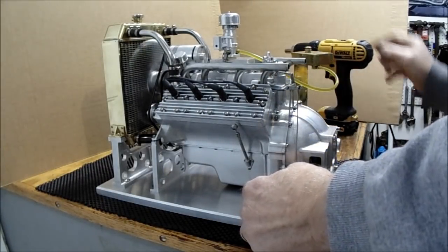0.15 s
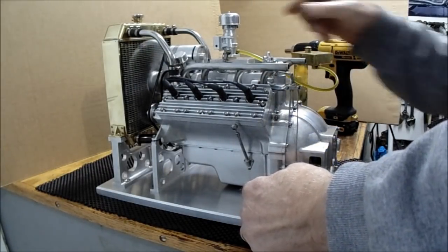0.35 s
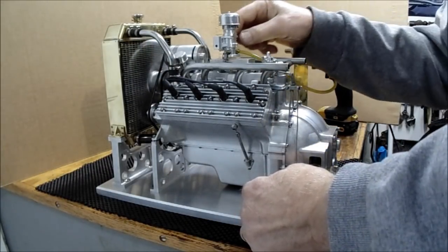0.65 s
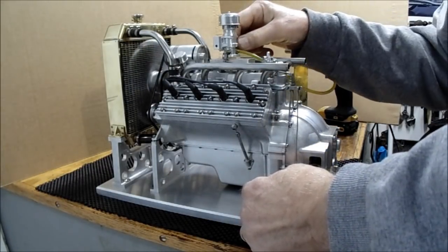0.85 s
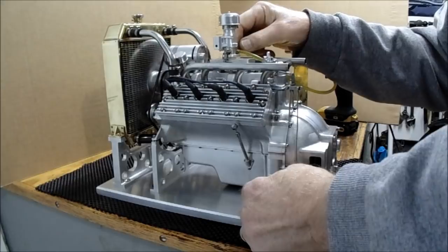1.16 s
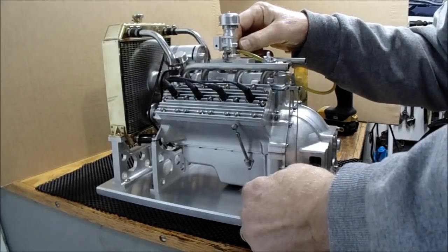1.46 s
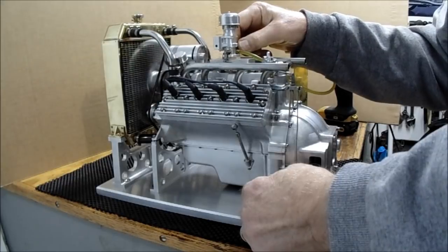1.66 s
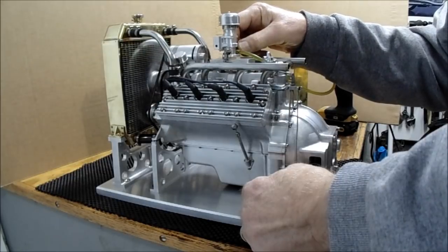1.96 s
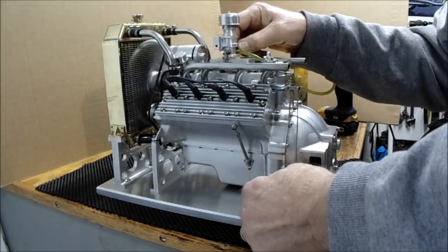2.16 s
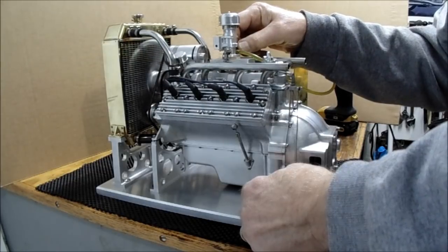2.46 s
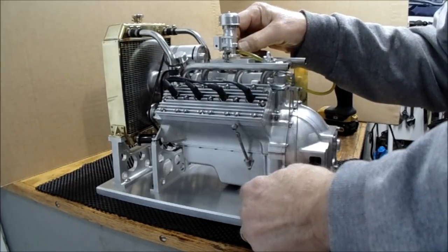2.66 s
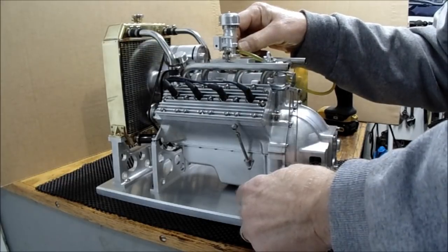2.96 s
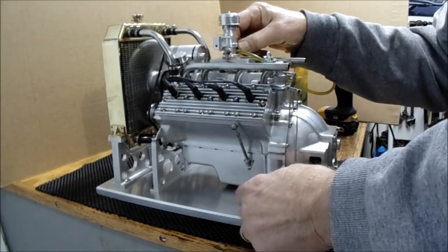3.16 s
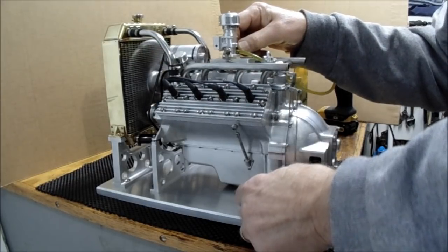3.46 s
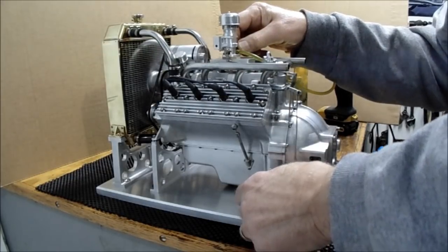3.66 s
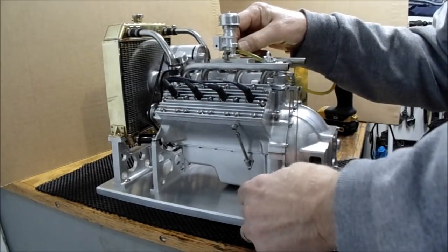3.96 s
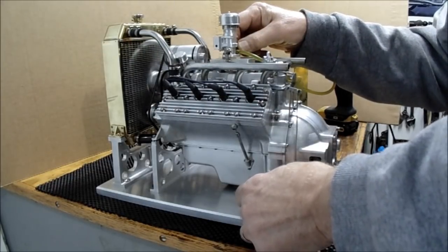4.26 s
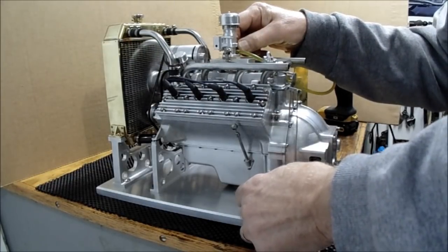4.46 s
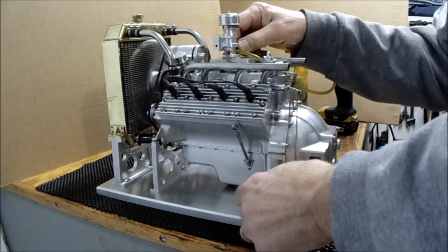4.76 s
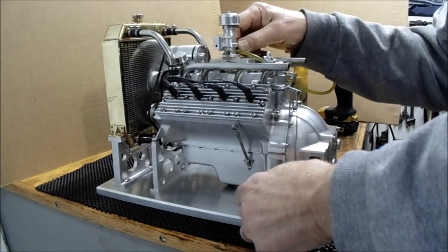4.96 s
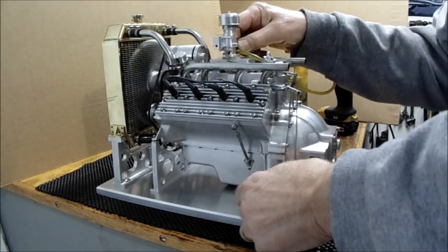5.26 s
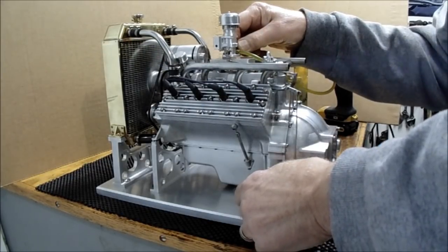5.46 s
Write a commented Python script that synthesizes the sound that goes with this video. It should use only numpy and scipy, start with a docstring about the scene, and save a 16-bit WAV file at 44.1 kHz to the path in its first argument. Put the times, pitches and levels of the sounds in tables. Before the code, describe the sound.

A miniature V8 engine idles lumpily on a workbench, revs up, drops back briefly, then climbs again to a hard, clattering snarl.

```python
"""A lumpy, stumbling idle: a miniature V8 chugs on a workbench, an arm's length away. It is opened up,
drops back as the throttle shuts, then climbs again to a hard snarl. Each firing booms in the exhaust
pipes, rings the block and spits gas. On top, the valve gear clatters, loose metal rattles and snaps,
and air whistles through the nearly closed carburettor. A low rumble and a short echo sit behind it."""
import sys
import numpy as np
from scipy import signal
from scipy.fft import rfft, irfft
from scipy.io import wavfile
from scipy.ndimage import uniform_filter1d

SR = 44100
rng = np.random.default_rng(int(sys.argv[2]) if len(sys.argv) > 2 else 0)


def materialize(psi):
    """Save the field psi as 16-bit PCM at rate SR to the path in sys.argv[1].

    A 1-D psi becomes a single channel; in a 2-D psi each row is a channel.
    """
    bounded = np.clip(np.atleast_2d(psi).T, -1, 1)
    quanta = np.round(bounded * 32767).astype(np.int16)
    wavfile.write(sys.argv[1], SR, quanta)


N = 247842
TIME = np.arange(N) / SR

# The rev curve, eight firings to a cycle. Each row: time in seconds, firings per second.
FIRING_RATE = [(0, 99.1), (.2, 93.8), (.4, 91.05), (.6, 93), (.8, 100), (1.02, 117), (1.2, 112),
               (1.35, 116), (1.7, 116.9), (1.95, 116.9), (2.08, 107.1), (2.24, 115), (2.42, 113.1),
               (2.58, 104.1), (2.72, 124), (2.86, 130.8), (3.0, 159.9), (3.2, 178.9), (3.35, 190.1),
               (3.58, 200), (3.65, 222), (3.73, 236), (3.85, 246.9), (3.95, 250), (3.99, 232),
               (4.03, 183.7), (4.15, 164.9), (4.25, 176.1), (4.33, 190), (4.45, 205.9), (4.6, 211.3),
               (4.7, 217.9), (4.8, 232), (4.87, 239.3), (4.93, 235.8), (5.0, 249.9), (5.1, 254.7),
               (5.3, 264.1), (5.45, 260.1), (5.62, 267.3)]
# How hard the engine works; layers follow it by a share. Each row: time in seconds, effort in dB.
ENGINE_EFFORT = [(0, -3.5), (.55, -3.5), (1.05, -0.6), (1.7, 0.15), (2.45, -0.8), (2.53, -3), (2.75, -0.14),
                 (3.05, 3.5), (3.2, 3), (3.55, 3), (3.7, 4.5), (3.8, 1.5), (3.96, 1.5), (4.02, -6),
                 (4.15, -8), (4.27, -2.5), (5.1, 2.5), (5.62, 2.5)]
# The cylinders, in firing order. Each row: exhaust and knock at idle, exhaust and knock at top speed,
# gas spit, all in relative dB, then lag in firing intervals for a fully uneven burn at top speed.
CYLINDER_VOICES = [(-1, -2.5, 3.5, 5.5, 19.5, 0.0028), (-0.5, 3.5, 3.5, 11.5, -5, -0.068),
                   (1, -0.5, -1, -6, 18, -0.0039), (-4.5, -2.5, -4.5, 10.5, 1, .07),
                   (-2, 3, -1.5, -3, 5, 0), (-1, 1.5, -8, 13.5, 0, -.07), (0.5, -3.5, -3, 14, 22, 0),
                   (1.5, -3.5, 2.5, -4, -9, .07)]
# Runs of strong firings. Each row: start in seconds, length in seconds, lift of the lope in dB.
IDLE_CHUGS = [(0.056, 0.032, 4.5), (0.233, 0.061, 3), (0.727, 0.13, 2), (0.979, 0.063, 5),
              (1.077, 0.083, 3.5), (1.278, 0.069, 4.5), (1.419, 0.056, 4.5), (1.57, 0.14, 4.5),
              (1.774, 0.043, 3.5), (1.883, 0.088, 4.5), (2.065, 0.11, 2.5), (2.208, 0.0424, 6.5),
              (2.376, 0.079, 6.5), (2.665, .28, 4.5)]
# Misfires. Each row: centre in seconds, dip of the lope in dB.
MISFIRE_DIPS = [(0.016, -8), (.195, -7), (.375, -8), (0.574, -5), (1.22, -4), (1.5, -5.5), (2.05, -2.5),
                (2.299, -8), (2.365, -7), (2.52, -7.5), (2.878, -4.5), (3.798, -4), (3.906, -8), (4.02, -5),
                (4.92, -7), (4.988, -7), (5.103, -8), (5.225, -4), (5.325, -5), (5.39, -5), (5.58, -5)]
# Bass thumps of the uneven burn. Each row: centre in seconds, level in dB.
BASS_THUMPS = [(.12, -39), (.25, -44), (.48, -39), (.61, -41), (.72, -41), (.84, -39.5), (.92, -38),
               (1.05, -34), (1.2, -35), (1.33, -35), (1.481, -30), (1.61, -34.5), (1.73, -34), (1.84, -34),
               (1.969, -33), (2.099, -34), (2.23, -34), (2.44, -28.5), (2.6, -38), (2.75, -32), (2.88, -34),
               (3.029, -33.5), (3.72, -36), (3.86, -38), (4.0, -36), (4.53, -38), (4.77, -39), (5.1, -35),
               (5.21, -38), (5.33, -37), (5.46, -37), (5.6, -35)]
# Brief surges in the knocking's middle band as the engine picks up. Each row: centre in seconds, boost in dB.
PICKUP_SURGES = [(3.03, 3), (3.64, 2)]
# Sharp metallic snaps. Each row: start in seconds, relative level in dB.
METAL_SNAPS = [(0.9837, -18), (1.842, -15), (2.1354, -17), (2.3934, -17), (2.451, -6.5), (2.7247, -13.5),
               (2.7855, -16), (2.8414, -15), (2.9786, -10), (3.0275, -17), (3.0775, -13), (3.091, -14),
               (3.3253, -10.5), (3.341, -15), (3.4236, -10.5), (3.686, -11), (3.703, -11), (3.727, -13),
               (3.7704, -18), (3.8363, -11.5), (4.8543, -14), (4.9182, -17), (4.9552, -17), (5.0215, -14),
               (5.1287, -15), (5.1472, -12), (5.2405, -15), (5.3732, -14), (5.3921, -12), (5.4226, -15),
               (5.4535, -14), (5.487, -15), (5.5153, -14), (5.5458, -15), (5.5751, -15)]
# The clean exhaust note of regular firing. Each row: time in seconds, base level in dB.
DRONE_LEVEL = [(0, -38), (.9, -35), (1.02, -26), (1.22, -28), (1.4, -25.5), (1.65, -22.5), (1.95, -23.5),
               (2.08, -32), (2.42, -30), (2.58, -32), (2.72, -22.5), (2.92, -22.5), (3.05, -28),
               (3.58, -32), (3.68, -21), (3.85, -18.5), (3.97, -22), (4.04, -43.5), (4.25, -38),
               (4.45, -31), (4.68, -30), (4.85, -22.5), (5.15, -21.5), (5.62, -23.5)]
# Overtones of the unequal cylinders. Each row: multiple of the cycle rate, base level in dB at middle
# speed, base level in dB at top speed.
CYCLE_OVERTONES = [(5, -42.5, -49), (10, -36, -33.5), (12, -39, -39), (13, -35, -43), (15, -33, -54),
                   (17, -40, -46), (21, -35.5, -58), (26, -52, -47), (27, -51, -44), (31, -53, -49),
                   (34, -46, -42.5), (42, -50, -49)]

# The exhaust's boom. Each row: pitch in Hz, width in Hz, gain in dB.
PIPE_MODES = [(125, 28, -19), (200, 22, -4.5), (236.8, 25.8, 0), (268.3, 34, 0), (312, 49.3, -3),
              (364, 48, -5.5), (516, 25.5, -16)]
# The pipe overtone that fast firings bring out. Each row: pitch in Hz, width in Hz, gain in dB.
SNARL_MODES = [(510, 41, -20)]
# The ring of block and base plate. Each row: pitch in Hz, width in Hz, gain in dB.
BLOCK_MODES = [(396, 32, 0.5), (515, 39, -2.5), (630, 41, 1.5), (721, 101, -0.5), (801, 85, 1),
               (876, 52, 6.5), (950, 37, 2), (1012.4, 34, 3), (1050, 20, 0.5), (1117, 75, -0.5),
               (1240, 39, -1), (1314, 33, -2.5), (1898, 80, -6.5)]
# The carburettor's whistle. Each row: pitch in Hz, width in Hz, gain in dB.
WHISTLE_MODES = [(1873, 152, 0.5), (3641, 142, 2), (5260, 120, -17), (13600, 400, -3.5)]
# The bright ring of loose metal. Each row: pitch in Hz, width in Hz, gain in dB.
RATTLE_MODES = [(5240, 280, -1.5), (6940, 1040, -2.5), (9430, 730, -3), (10700, 1140, -5.5),
                (12220, 500, 2.5), (13260, 430, 1.5)]
# The clatter's tone with the throttle shut. Each row: frequency in Hz, gain in dB.
CLATTER_EQ_SHUT = [(1200, -7.5), (2100, -5), (3200, -1.5), (4100, -4), (4600, -7.5), (5400, -7),
                   (6500, -4.5), (7700, -3.5), (11700, -5), (12800, -5), (13700, -4.5), (15000, -6)]
# The clatter's tone with the throttle open. Each row: frequency in Hz, gain in dB.
CLATTER_EQ_OPEN = [(900, -10.5), (1400, 4), (1800, -2.5), (2200, -3), (3300, -3), (4000, -4.5),
                   (4600, -9.5), (5400, -4.5), (6000, -5), (7200, -3.5), (8700, -6), (11500, -5.5),
                   (12300, -1.5), (15000, -6.5)]

CYLINDER_COUNT = len(CYLINDER_VOICES)
BOOM_HZ, BOOM_WIDTH_HZ = 245.5, 22  # where the firing rate meets the pitch of the pipes


def undb(db):
    """Decibels to gain."""
    return np.exp(np.asarray(db) * (np.log(10) / 20))


def curve(rows):
    """An automation line through (seconds, value) points."""
    return np.interp(TIME, *np.transpose(rows))


def bell(x, centre, width):
    """A smooth hump, 1 at the centre."""
    return np.exp(-((x - centre) / width) ** 2)


def wander(per_s):
    """A random drift with a spread near 1."""
    return np.interp(TIME * per_s, np.arange(512), rng.standard_normal(512))


def unit(x):
    """Scale to an rms of 1."""
    return x / np.sqrt(np.mean(x ** 2))


def even(x, size=8000):
    """Ride the level to an rms of 1 over size samples; the quicker throb stays in."""
    return x / np.sqrt(uniform_filter1d(x ** 2, size) + 1e-12)


def clicks(times, sizes):
    """Impulses, each shared between its two nearest samples."""
    position = np.clip(times * SR, 0, N)
    sample = position.astype(int)
    late = position - sample
    train = np.bincount(sample, sizes * (1 - late), N + 2) + np.bincount(sample + 1, sizes * late, N + 2)
    return train[:N]


def through(x, response):
    """Convolve with an impulse response."""
    return signal.oaconvolve(x, response)[:N]


def fade(decay_s):
    """An exponential tail."""
    return np.exp(-TIME[:8192] / decay_s)


def burst(decay_s):
    """A dense, decaying ring of unit energy."""
    tail = fade(decay_s)
    ring = tail * rng.standard_normal(len(tail))
    return ring / np.linalg.norm(ring)


def noise_hits(times, sizes, envelope):
    """Noise gated open by the envelope at every hit."""
    return through(clicks(times, sizes), envelope) * rng.standard_normal(N)


def cylinder_hits(times, cylinder, sizes, ring_s):
    """Each cylinder strikes its own spot, so each has its own ring."""
    return sum(through(clicks(times, sizes * (cylinder == k)), burst(ring_s))
               for k in range(CYLINDER_COUNT))


def band(x, lo_hz, hi_hz):
    """Band-pass."""
    return signal.sosfilt(signal.butter(2, [lo_hz, hi_hz], "band", fs=SR, output="sos"), x)


def resonate(x, modes):
    """Parallel resonances of alternating sign."""
    return sum((-1) ** k * undb(db) * signal.lfilter(*signal.iirpeak(hz, hz / width, SR), x)
               for k, (hz, width, db) in enumerate(modes))


def equalise(x, points, size=4096):
    """Minimum-phase EQ through (Hz, dB) points."""
    hz, db = np.transpose(points)
    bin_hz = np.maximum(np.arange(size // 2 + 1) * SR / size, 1)
    cepstrum = irfft(np.log(undb(np.interp(np.log(bin_hz), np.log(hz), db))))
    cepstrum[1:size // 2] *= 2
    cepstrum[size // 2 + 1:] = 0
    return through(x, irfft(np.exp(rfft(cepstrum))))


def rumble(speed, effort):
    """A low bed around the bench that swells through the middle revs."""
    level_db = -47 + 0.27 * effort + 8 * bell(speed, centre=190, width=67)
    return unit(band(rng.standard_normal(N), 50, 234)) * undb(level_db)


def bench_echo(metal, gain_db=-13):
    """The boards around the bench throw back a short echo, a few milliseconds late."""
    return undb(gain_db) * through(metal, np.r_[np.zeros(200), burst(decay_s=0.018)])


def buzz(times, sizes, pitch_hz=5236, width_hz=480):
    """A thin metal part buzzes with the knocks."""
    drive = noise_hits(times, sizes, fade(0.0047))
    return even(band(drive, pitch_hz - width_hz / 2, pitch_hz + width_hz / 2))


def snaps(trim_db=-8):
    """Now and then a hard snap rings the loose metal."""
    times, db = np.transpose(METAL_SNAPS)
    envelope = through(clicks(times, undb(db + trim_db)), fade(0.0038))
    return envelope * unit(band(resonate(rng.standard_normal(N), RATTLE_MODES), 3300, 14200))


def rattle(times, spit, throttle, scatter_db=3):
    """Under load loose metal chatters, struck hardest by the cylinders that spit most."""
    sizes = spit * undb(scatter_db * np.clip(rng.standard_normal(2048)[:len(times)], -2, 2))
    drive = unit(through(clicks(times, sizes), fade(0.0013))) * rng.standard_normal(N)
    return even(band(resonate(drive, RATTLE_MODES), 5400, 22000), size=16000) * np.sqrt(throttle)


def carburettor(times, speed, fade_above_hz=141, db_per_hz=-0.1644):
    """Air gulped past the throttle sings in narrow bands; the whistle fades as the engine opens up."""
    gulps = unit(through(clicks(times, 1), fade(0.0041)))
    air = (1 + gulps) * rng.standard_normal(N)
    whistle = sum(undb(db) * band(air, hz - width / 2, hz + width / 2) for hz, width, db in WHISTLE_MODES)
    return even(whistle) * undb(db_per_hz * np.maximum(speed - fade_above_hz, 0))


def clatter(times, cylinder, spit, throttle, puff_s=0.00074, tap_scatter_db=7.5):
    """Gas spits at each firing, tappets click in between, gears whirr; the tone follows the throttle."""
    tail = fade(puff_s)
    gas = noise_hits(times, spit, tail * TIME[:len(tail)])  # rounded puffs that peak after puff_s
    timing, force = rng.standard_normal((2048, 2))[:len(times)].T
    tap_times = times + np.gradient(times) * (0.45 + 0.0556 * timing)
    tap_sizes = undb(tap_scatter_db * np.clip(force, -2, 2))
    taps = cylinder_hits(tap_times, cylinder, tap_sizes, ring_s=0.0014)
    hits = undb(1.5) * even(gas) + undb(-4) * even(taps)
    whirr = undb(-3) * rng.standard_normal(N)
    drive = hits * undb(-15 + 5 * throttle) + whirr
    shut, opened = unit(equalise(drive, CLATTER_EQ_SHUT)), unit(equalise(drive, CLATTER_EQ_OPEN))
    return even((1 - throttle) * shut + throttle * opened)


def block(times, cylinder, sizes, speed, revs):
    """Knocks ring the block; with the revs their pattern rises out of a loose shaking."""
    knocks = cylinder_hits(times, cylinder, sizes, ring_s=0.0039)
    shaking = noise_hits(times, sizes, fade(0.014))
    drive = undb(10 * revs) * unit(knocks) + undb(-1.5) * unit(shaking)
    ring = even(band(resonate(drive, BLOCK_MODES), 290, 2150), size=2600)
    octave_boom_db = 1.5 * bell(2 * speed, BOOM_HZ, BOOM_WIDTH_HZ)
    bark_db = sum(db * bell(TIME, s, width=0.07) for s, db in PICKUP_SURGES)
    return ring * undb(-4 * revs + octave_boom_db + bark_db)


def thumps(pitch_hz=119, width_s=0.024):
    """Surges of the uneven burn swell briefly in the lowest note of the pipes."""
    return np.sqrt(2) * sum(undb(db) * bell(TIME, s, width_s) * np.sin(2 * np.pi * pitch_hz * (TIME - s))
                            for s, db in BASS_THUMPS)


def overtones(speed, middle_hz=196, top_hz=232):
    """Unequal cylinders repeat every cycle and add wavering overtones that climb with the revs."""
    cycle_phase = 2 * np.pi * np.cumsum(speed) / SR / CYLINDER_COUNT
    fast = np.interp(speed, [middle_hz, top_hz], [0, 1])
    chord = np.zeros(N)
    for multiple, middle_db, top_db in CYCLE_OVERTONES:
        tone = np.sin(multiple * cycle_phase + rng.uniform(0, 2 * np.pi))
        chord += tone * undb((1 - fast) * middle_db + fast * top_db + 3 * wander(per_s=18))
    return chord


def pipes(gas, revs):
    """The hollow body of the exhaust pipes; high revs add a snarl."""
    return band(resonate(gas, PIPE_MODES) + revs * resonate(gas, SNARL_MODES), 69, 790)


def drone(speed, revs, lope_db):
    """Regular firing sounds a wobbly note in the pipes; it throbs once a cycle and swells with chugs."""
    phase = 2 * np.pi * np.cumsum(speed) / SR + 0.3 * wander(per_s=55)
    gas = np.cos(phase) + undb(1) * np.cos(2 * phase) + undb(-7) * np.cos(3 * phase)
    waver_db = 2.2 * wander(per_s=70)
    throb_db = (1 + 3.2 * revs) * np.cos(phase / CYLINDER_COUNT)
    level_db = curve(DRONE_LEVEL) + 0.85 * lope_db + waver_db + throb_db
    return even(pipes(gas, revs=0), size=1300) * undb(level_db)


def exhaust(times, sizes, revs, wake_db=-13, wake_s=0.0088):
    """The lead voice: each gas pulse and its turbulent wake boom in the pipes, with a slight flutter."""
    flutter_db = 1.07 * wander(per_s=24)
    wake = noise_hits(times, sizes, fade(wake_s))
    gas = unit(clicks(times, sizes)) + undb(wake_db) * unit(wake)
    return even(pipes(gas, revs), size=2600) * undb(flutter_db - 2.5 * revs)


def lope(attack_s=0.008, release_s=0.0166, gap_s=0.013):
    """The engine's limp, in dB: chugs swell, hold and let go; misfires punch short holes."""
    chugs = sum(db * np.interp(TIME - s, [0, attack_s, length, length + release_s], [0, 1, 1, 0])
                for s, length, db in IDLE_CHUGS)
    return chugs + sum(db * bell(TIME, s, gap_s) for s, db in MISFIRE_DIPS)


def unevenness(speed, revs, lope_db, at_idle=0.757):
    """How ragged the burn is, 0-1: revs, booming pipes and chugs steady it; middle speeds stumble."""
    steadying = 0.2 * revs + 0.05 * bell(speed, BOOM_HZ, BOOM_WIDTH_HZ) + 0.13 * lope_db
    stumble = 0.396 * bell(speed, centre=167.8, width=42.2)
    return np.clip(at_idle - steadying + stumble, 0, 1)


def firings(speed, uneven, revs, scatter_db):
    """Times, cylinders and randomly weakened strengths; an uneven burn lights late or early."""
    count = np.cumsum(speed) / SR
    number = np.arange(int(count[-1]) + 1)
    cylinder = number % CYLINDER_COUNT
    uneven, revs = np.interp(number, count, uneven), np.interp(number, count, revs)
    timing, force = rng.standard_normal((2048, 2))[number].T
    lag = uneven * (revs * np.array(CYLINDER_VOICES)[cylinder, 5] + 0.23 * timing)
    strength = undb(-abs((scatter_db - 4 * uneven) * force))
    return np.interp(number + lag, count, TIME), cylinder, strength


def scene(shut_hz=100, open_hz=179):
    """The mono mix: speed sets the rhythm, while effort and lope ride the faders."""
    speed, effort, lope_db = curve(FIRING_RATE), curve(ENGINE_EFFORT), lope()
    revs = (speed - speed.min()) / np.ptp(speed)  # 0 at idle, 1 at top speed
    throttle = np.clip((speed - shut_hz) / (open_hz - shut_hz) + 0.12 * effort, 0, 0.97)
    uneven = unevenness(speed, revs, lope_db)
    times, cylinder, strength = firings(speed, uneven, revs, scatter_db=8)
    # Knocks keep closer to the crank, so their rhythm is tighter.
    knock_times, _, knock_strength = firings(speed, 0.45 * uneven, revs, scatter_db=3.5)
    # The accents move to different cylinders as the revs rise.
    voices = np.array(CYLINDER_VOICES)[cylinder].T
    fast = np.interp(times, TIME, revs)
    boom, knock = undb((1 - fast) * voices[:2] + fast * voices[2:4])
    spit = undb(voices[4]) * strength

    body = exhaust(times, boom * strength, revs) * undb(-25.3 + 1.15 * effort + 0.68 * lope_db)
    body += drone(speed, revs, lope_db) + thumps()
    body += overtones(speed) * throttle * np.sqrt(revs) * undb(0.96 * effort)

    knocking = block(knock_times, cylinder, knock * knock_strength, speed, revs)
    chatter = clatter(times, cylinder, spit, throttle) + undb(-8) * rattle(times, spit, throttle)
    metal = knocking * undb(-29 + 0.97 * effort + 0.42 * lope_db)
    metal += chatter * undb(-29.3 + 1.07 * effort + 0.24 * lope_db)
    metal += buzz(knock_times, knock) * undb(-41 + 1.95 * effort - 11.5 * revs)
    metal += carburettor(times, speed) * undb(-35.5 + 0.72 * effort)
    metal += snaps()
    return (body + metal + bench_echo(metal) + rumble(speed, effort))[None]


def record(dry, low_cut_hz=30, high_cut_hz=14300):
    """Master EQ: roll off the deepest bass and cut the top steeply."""
    lean = signal.sosfilt(signal.butter(2, low_cut_hz, "high", fs=SR, output="sos"), dry)
    return signal.sosfilt(signal.ellip(12, 0.2, 95, high_cut_hz, fs=SR, output="sos"), lean)


dry = scene()
out = record(dry)
materialize(out)
```